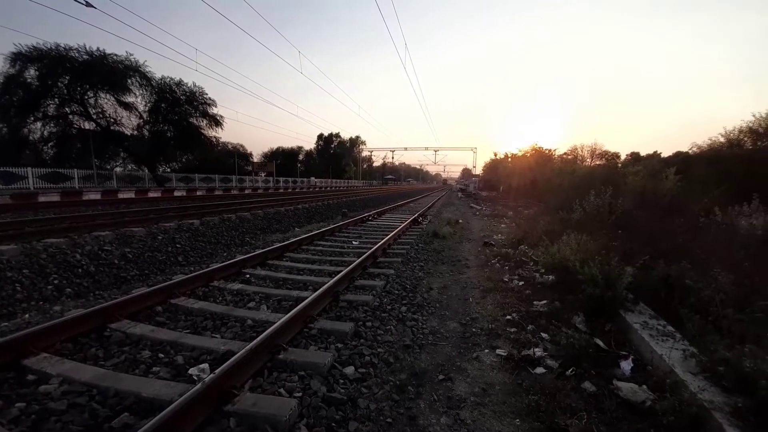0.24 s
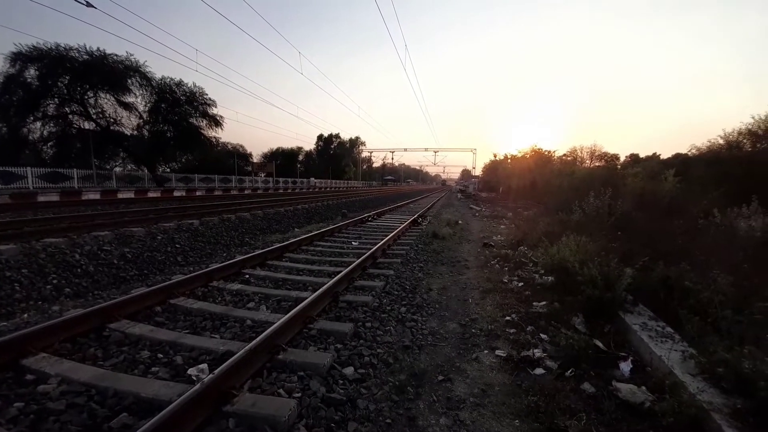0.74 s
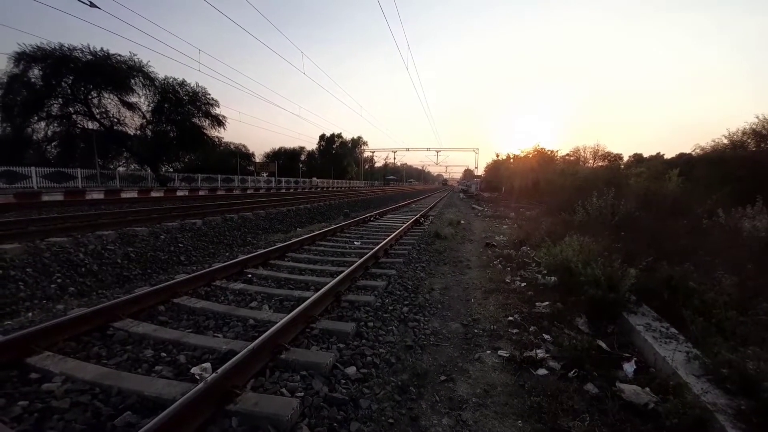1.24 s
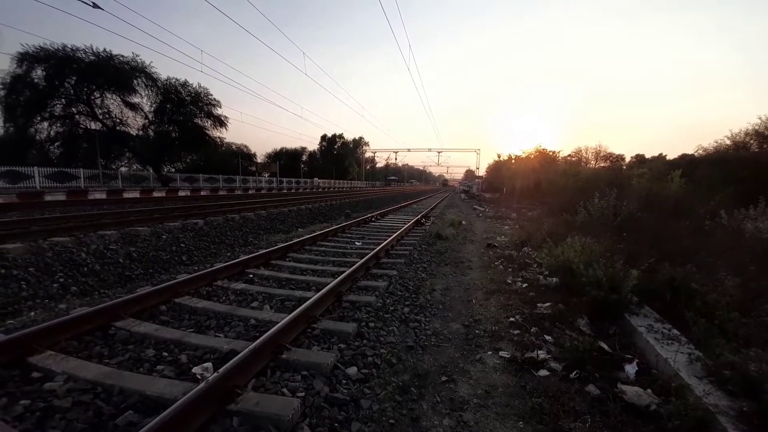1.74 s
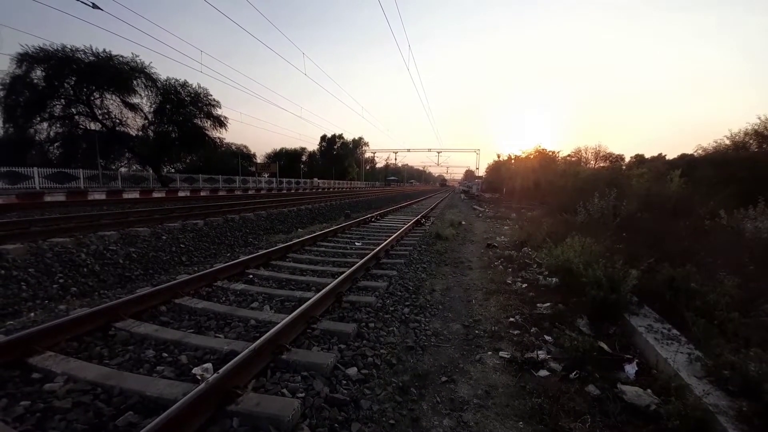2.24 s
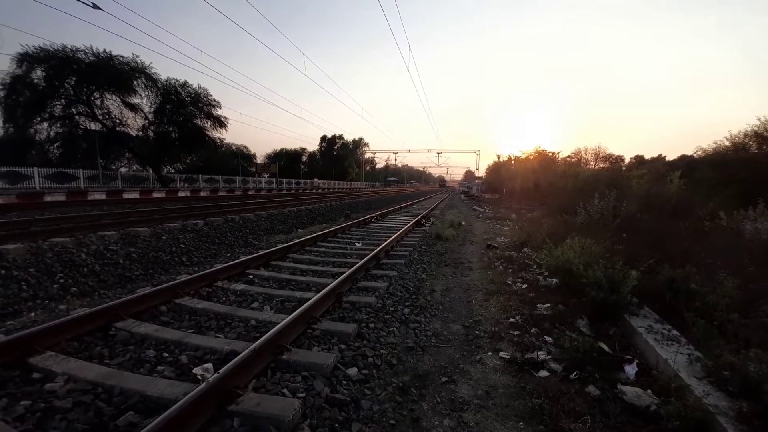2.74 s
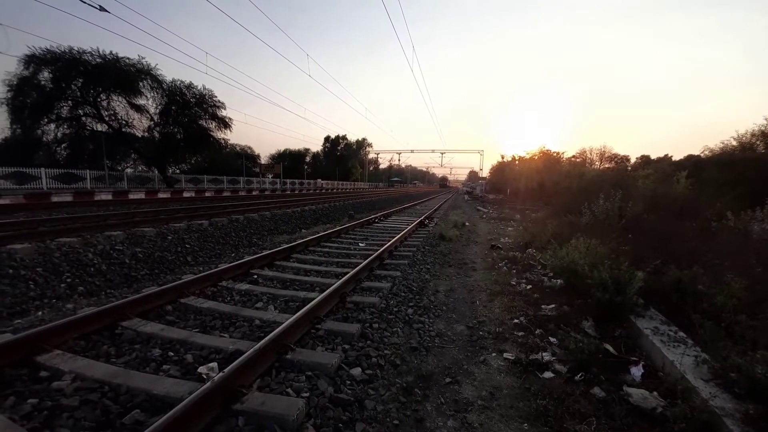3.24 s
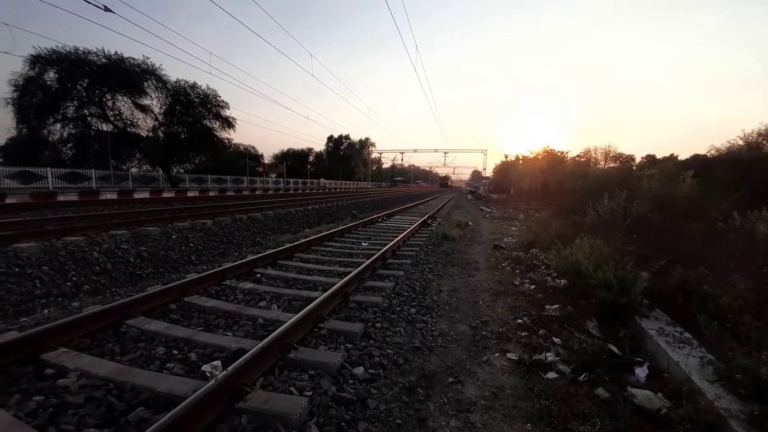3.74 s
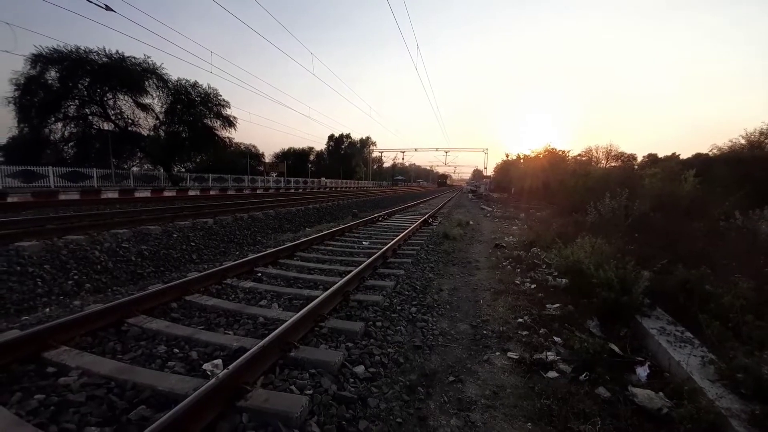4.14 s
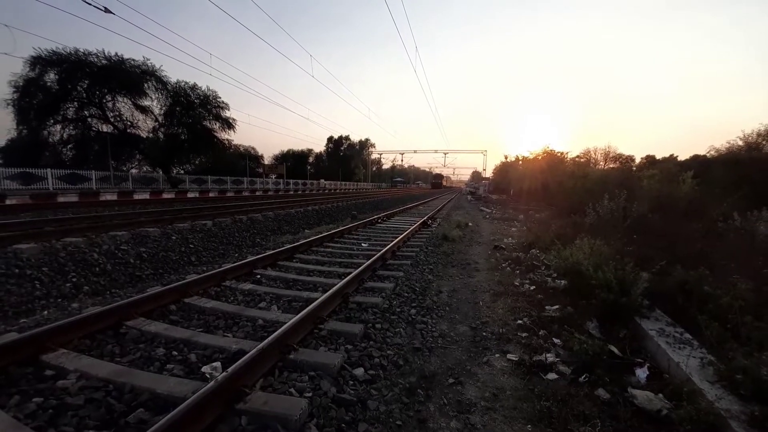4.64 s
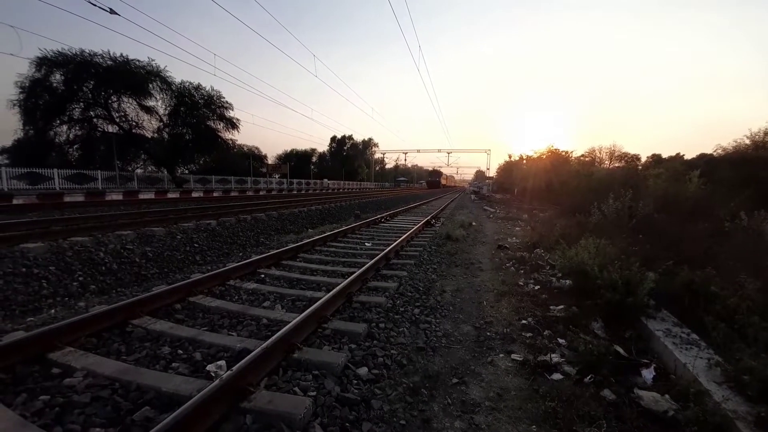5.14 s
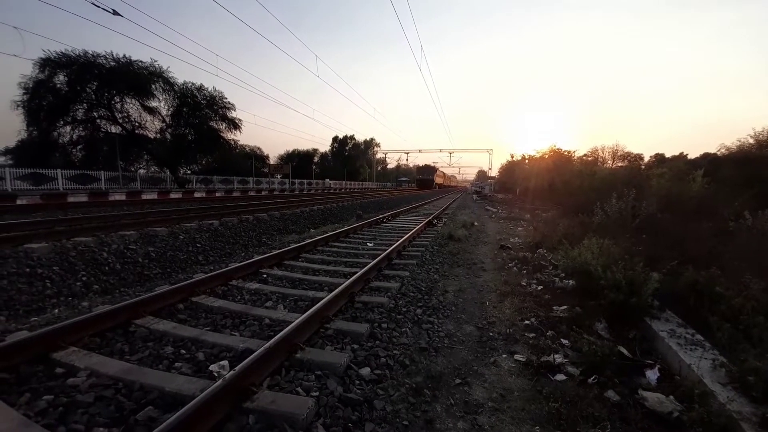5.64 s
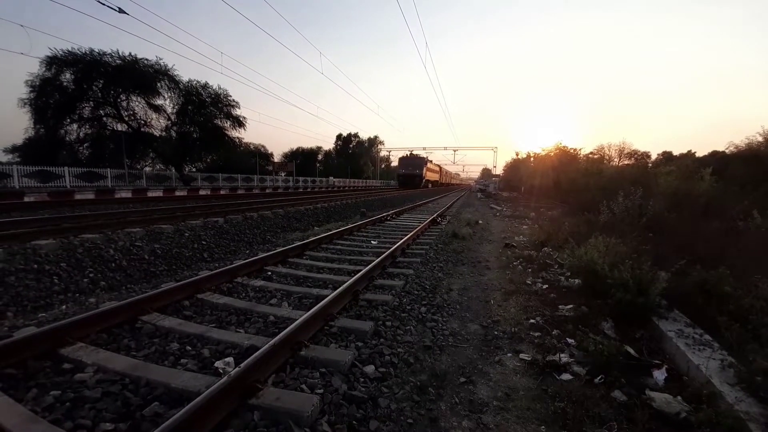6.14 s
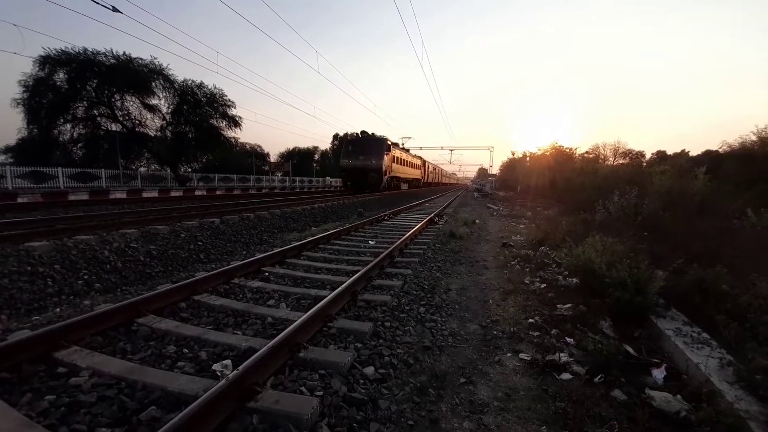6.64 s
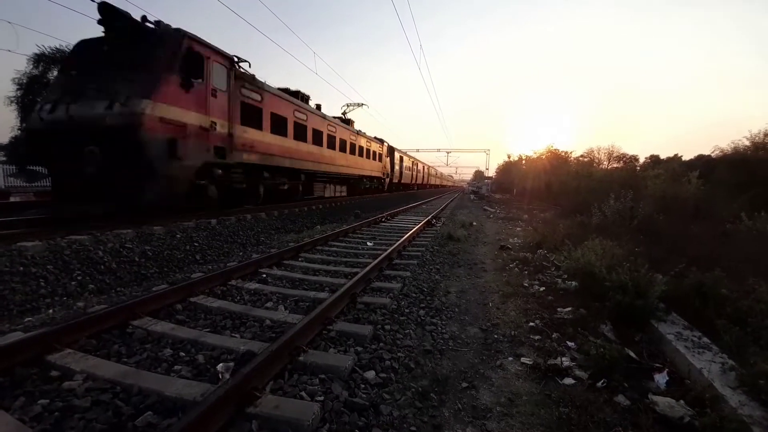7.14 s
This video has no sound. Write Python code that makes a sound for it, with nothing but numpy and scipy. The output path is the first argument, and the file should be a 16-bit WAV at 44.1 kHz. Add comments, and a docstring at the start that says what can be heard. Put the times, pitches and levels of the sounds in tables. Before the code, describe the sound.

A sustained mid-pitched train horn approaches, growing louder, its brassy edge fading and returning as air pressure sags. Small birds whistle and an insect rasps faintly beneath. After the blast dies with a short echo, metallic wheel tones emerge from blurred rolling noise. One brief gentle toot rings out, then heavy rumble, steel roar and hiss swell abruptly to the end. Open air, fixed stereo microphone close to the track.

```python
"""An electric express nears on open track, one long horn blast already sounding: beating, Doppler-lowered partials.
Trees and masts return late echoes at lower pitch; birds (arcs of pitch) and an insect (noise rasps) call early on.
As the blast stops, wobbling wheel tones rise out of a blur of noise, and a short, soft toot follows.
Rumble, rolling noise and rail hiss, all shaped noise, swell until the engine draws level near the end."""
import sys
import numpy as np
from scipy import signal
from scipy.fft import rfft, irfft, next_fast_len
from scipy.io import wavfile
from scipy.ndimage import uniform_filter1d

SR = 44100
rng = np.random.default_rng(int(sys.argv[2]) if len(sys.argv) > 2 else 0)


def log_audio(samples):
    """Write samples as a 16-bit WAV file to the path given in sys.argv[1]."""
    # one column per channel
    frames = np.atleast_2d(samples).T
    # limit to full scale, then quantise
    limited = np.clip(frames, -1, 1)
    pcm = np.round(limited * 32767).astype(np.int16)
    wavfile.write(sys.argv[1], SR, pcm)


N = 325017
TIME = np.arange(N) / SR
FREQS = np.maximum(np.fft.rfftfreq(N, 1 / SR), 1)

# the engine runs straight at the listener and draws level at PASS_S
SPEED_M_PER_S, PASS_S = 31.1, 7.33
# the horn's levels hold at HORN_DISTANCE_M; the valve is shut at BLAST_END_S, the blare dies sooner
HORN_DISTANCE_M, BLAST_END_S, BLARE_END_S = 80.6, 5.16, 5.06
# horn pitch with the valve wide open, and its rise when the air sags
OPEN_HZ, SAG_RANGE_HZ = 377, 9
# pitch of the long blast, lowest with the valve wide open, rising as the air sags: [t/s, f/Hz]
HORN_PITCH = [(0.0, 377.2), (0.6, 377.2), (0.93, 379.7), (1.08, 379.2), (1.33, 385.5), (1.6, 386.6),
              (1.73, 386.1), (1.86, 381.7), (2.22, 379.6), (2.48, 382.0), (2.88, 382.4), (3.03, 380.3),
              (3.3, 378.8), (3.55, 380.5), (3.82, 381.5), (4.07, 377.1), (4.9, 377.1), (5.12, 386.4)]
# width of the sound field: [f/Hz, side-to-mid level/dB]
FIELD_WIDTH = [(60, -12), (150, -19.5), (330, -9), (650, -6), (950, 0.5), (1150, 7), (1500, -2.5),
               (2500, -2), (15000, 0)]


def from_db(db):
    """Decibels to gain."""
    return 10 ** (np.asarray(db) / 20)


def rms_one(x):
    """Scale to unit rms."""
    return x / np.sqrt(np.mean(x ** 2) + 1e-20)


def in_time(rows):
    """Each column of a curve table at every sample."""
    s, *columns = np.transpose(rows)
    return [np.interp(TIME, s, column) for column in columns]


def at_hz(points, hz):
    """Read a table on a log-frequency axis."""
    table_hz, values = np.array(points)[:, 0], np.array(points)[:, 1]
    return np.interp(np.log(hz), np.log(table_hz), values)


def bumps_db(rows):
    """Smooth rises and dips in level from rows of (s, half length s, dB)."""
    return sum(db * np.exp(-((TIME - s) / half_s) ** 2) for s, half_s, db in rows)


def drift(rate_hz):
    """Slow random wander of spread 1: noise through a two-pole lowpass, one value per 100 samples."""
    r = np.exp(-200 * np.pi * rate_hz / SR)
    steps = rng.standard_normal(N // 100 + 1002)
    slow = signal.lfilter([1], [1, -2 * r, r * r], steps)[1000:]   # the filter has settled
    return np.interp(np.arange(N) / 100, np.arange(len(slow)), rms_one(slow))


def pan(db):
    """Left and right gains for a level difference."""
    return from_db(np.array([[db], [-db]]) / 2)


def late(x, delay_s):
    """Delay a sound that was already going on."""
    return np.interp(TIME - delay_s, TIME, x)


def gate(start_s, end_s, rise_s, fall_s):
    """Opens at the start, is shut by the end."""
    return np.clip((TIME - start_s) / rise_s, 0, 1) * np.clip((end_s - TIME) / fall_s, 0, 1)


def note(start_s, attack_s, hold_s, t60_s):
    """Attack, hold and a ringing release."""
    age = np.maximum(TIME - start_s, 0)
    return (1 - np.exp(-age / attack_s)) * from_db(-60 * np.maximum(age - hold_s, 0) / t60_s)


def field(gain):
    """Stereo noise with a gain per frequency and a width per frequency; the mid has rms 1."""
    size = next_fast_len(N)
    hz = np.maximum(np.fft.rfftfreq(size, 1 / SR), 1)
    mid, side = rfft(rng.standard_normal((2, size))) * np.interp(hz, FREQS, gain)
    mid = irfft(mid, size)[:N]
    side = irfft(side * from_db(at_hz(FIELD_WIDTH, hz)), size)[:N]
    return np.array([mid + side, mid - side]) / np.std(mid)


def noise(spectrum):
    """Stereo noise that falls away by a further 12 dB per octave beyond the ends of its spectrum."""
    ends = np.minimum(FREQS / spectrum[0][0], 1) * np.minimum(spectrum[-1][0] / FREQS, 1)
    return field(from_db(at_hz(spectrum, FREQS)) * ends * ends)


def ahead_m():
    """Track that the engine has still to cover."""
    return SPEED_M_PER_S * np.maximum(PASS_S - TIME, 0)


def nearing(level_db, reach_m, falloff, loss_db_per_m=0):
    """Gain of a source on the train: level_db when alongside, less by spreading and loss farther off."""
    spreading = np.hypot(1, ahead_m() / reach_m) ** -falloff
    return from_db(level_db - loss_db_per_m * ahead_m()) * spreading


def horn_distance():
    """Distance of the horn as a multiple of HORN_DISTANCE_M."""
    return np.maximum(ahead_m(), 1) / HORN_DISTANCE_M


def sag():
    """Loss of air pressure in the horn: 0 wide open, about 1 at its weakest."""
    return np.maximum(in_time(HORN_PITCH)[0] - OPEN_HZ, 0) / SAG_RANGE_HZ


def partial(phase, order, lead=0.33):
    """One horn partial of rms 1, its phase ahead in the left channel (lead in radians)."""
    angle = ((order * phase + rng.uniform(0, 2 * np.pi)) % (2 * np.pi)).astype(np.float32)
    return np.sqrt(2) * np.cos(angle + np.float32([[lead], [-lead]]) / 2)


def blare_partials():
    """The horn's upper partials as (multiple, dB)."""
    # partials 4 to 15, relative to each other: [level/dB]
    upper_levels = [-5.5, 0, -0.5, -4.5, -7, -14, -21, -20.5, -23.5, -27.5, -24.5, -30.5]
    return list(enumerate(upper_levels, 4))


def horn(jitter=0.00038):
    """The diaphragm buzzes in a flared bell; as the air pressure sags it goes sharp and dull."""
    pitch, = in_time(HORN_PITCH)
    phase = 2 * np.pi * np.cumsum(pitch * (1 + jitter * drift(38))) / SR
    return horn_fundamental(phase) + horn_core(phase) + horn_brass(phase)


def horn_fundamental(phase, level_db=-17.5, sag_loss_db=4.0, falloff=0.88, echo_db=-12.0,
                     linger_s=0.11, release_s=.13):
    """The lowest partial beats against a trackside echo, faster as the engine nears, and outlasts the blare."""
    beat_per_s, beat_rise_per_s2, first_beat_s = 2.98, .74, .073   # beat rate at 0 s, its rise, first minimum
    # brief dips and swells of the fundamental: [t/s, half length/s, level/dB]
    fades = [(0.058, 0.028, -13), (0.425, .03, -13), (0.921, .03, -9), (1.054, 0.045, 5), (1.72, 0.072, -5),
             (2.08, .05, 3), (2.18, 0.029, -18), (3.294, 0.035, 3)]
    beats = beat_per_s * (TIME - first_beat_s) + beat_rise_per_s2 * (TIME ** 2 - first_beat_s ** 2) / 2
    with_echo = 1 - from_db(echo_db) * np.exp(-2j * np.pi * beats)
    gain = from_db(level_db - sag_loss_db * sag() ** 2 + bumps_db(fades)) * horn_distance() ** -falloff
    blowing = gate(-1, BLAST_END_S + linger_s, .1, release_s)
    return gain * np.abs(with_echo) * blowing * partial(phase + np.angle(with_echo), order=1)


def horn_core(phase, second_db=-20.5, third_db=-24.0, sag_loss_db=11.5, sag_power=2.12, falloff=0.61,
              flutter_db=0.64, waver_db=0.82, release_s=0.3):
    """The second and third partials hold up until the air gets really weak."""
    gain = from_db(-sag_loss_db * sag() ** sag_power) * horn_distance() ** -falloff
    gain = gain * gate(-1, BLAST_END_S + 0.11, .1, release_s)
    second = from_db(second_db + waver_db * drift(9.8)) * partial(phase, order=2)
    third = from_db(third_db + flutter_db * drift(37)) * partial(phase, order=3)
    return gain * (second + third)


def horn_brass(phase, level_db=-36.5, sag_loss_db=20.0, sag_power=0.78, falloff=.5, twinkle_db=2.86,
               dip_hz=2820, dip_width_hz=400, release_s=0.094):
    """The blare needs full pressure. The ground cancels a band of it; turbulent air makes it twinkle."""
    # depth of the dip the ground cuts, negative where it lifts the band: [t/s, depth/dB]
    ground_dip = [(0, 12.5), (1.1, 8.5), (2.1, 6.5), (3.3, 4.5), (4.05, -5.5), (4.4, -2), (4.9, 6.5)]
    # moments when the blare swells or fades: [t/s, half length/s, level/dB]
    blare_swells = [(.25, .2, 1), (1.0, 0.21, -2.5), (2.02, .19, 5.5), (3.35, .28, -3.5), (4.15, .15, 1.5)]
    gain = from_db(level_db - sag_loss_db * sag() ** sag_power) * horn_distance() ** -falloff
    gain = gain * gate(-1, BLARE_END_S, .1, release_s)
    dip_db, = in_time(ground_dip)
    out = 0
    for multiple, db in blare_partials():
        cancelled_db = dip_db * np.exp(-((multiple * OPEN_HZ - dip_hz) / dip_width_hz) ** 2)
        twinkle = twinkle_db * drift(2.5)
        out = out + from_db(db - cancelled_db + twinkle) * partial(phase, order=multiple)
    return gain * from_db(bumps_db(blare_swells)) * out


def horn_echoes(first_db=-19.0, second_db=-12.0, third_db=-4.0, brass_db=-31.5, scatter_db=-29.5,
                core_sag_db=4.0, brass_sag_db=9.0, falloff=0.52, brass_falloff=0.58, linger_s=0.22,
                fade_db=3.5, wander=0.003, count=12):
    """Objects beside and behind the train hear a lower pitch and send it back late."""
    # strong echoes: [Doppler ratio, delay/s, level/dB, left-right difference/dB, overtone level/dB]
    strong = [(.843, .22, -18.5, -1, 2), (.981, 0.046, -19, -11, -4.5), (.99, 0.137, -19, 2.5, -4)]
    # weak echoes at random delays and sides, same columns
    weak = np.column_stack([np.linspace(.85, .975, count), rng.uniform(.05, .35, count),
                            np.full(count, scatter_db), rng.normal(0, 2.8, count), np.zeros(count)])
    pitch, = in_time(HORN_PITCH)
    carried = from_db(first_db) * horn_distance() ** -falloff
    blowing = gate(-1, BLAST_END_S, .1, 0.13)
    first_strength = carried * gate(-1, BLAST_END_S + linger_s, .1, 0.39)
    core_strength = carried * from_db(-core_sag_db * sag()) * blowing
    brass_strength = from_db(brass_db - brass_sag_db * sag()) * horn_distance() ** -brass_falloff * blowing
    # partials as (multiple, dB) with their strength in time; 0.98 sounds as 1, it only sets the width
    groups = [([(0.98, 0)], first_strength),
              ([(2, second_db), (3, third_db)], core_strength),
              (blare_partials(), brass_strength)]
    turn = np.linspace(0, 2 * np.pi, 4096, endpoint=False)   # one cycle, read as a wavetable
    out = np.zeros((2, N))
    for ratio, delay_s, db, side_db, overtones_db in np.vstack([strong, weak]):
        cycles = np.cumsum(ratio * late(pitch, delay_s) * (1 + wander * drift(9.63))) / SR
        place = (cycles * len(turn)).astype(int) % len(turn)
        level = from_db(db + fade_db * drift(4.0))
        for partials, strength in groups:
            multiples, partial_db = np.transpose(partials)[:, :, None]
            # random phases, which differ more between left and right where the field is wide
            spread = np.minimum(from_db(at_hz(FIELD_WIDTH, multiples * OPEN_HZ)), 1)
            offsets = rng.uniform(0, 2 * np.pi, multiples.shape)
            offsets = offsets + spread * rng.standard_normal((2,) + multiples.shape)
            gains = from_db(partial_db + overtones_db * (multiples > 1))
            wave = np.sqrt(2) * np.sum(gains * np.cos(np.round(multiples) * turn + offsets), axis=1)
            out += np.take(wave * pan(side_db), place, axis=1) * (late(strength, delay_s) * level)
    return out


def scattered_blare(level_db=-42.0, sag_loss_db=19.0, falloff=1.13, delay_s=.05, release_s=0.61):
    """Leaves and ballast smear the top of the horn into a bright haze of noise."""
    # colour of the haze: [f/Hz, relative level/dB per Hz]
    haze = [(1700, -14), (2200, -4), (2550, -7.5), (2950, 1), (3400, -3), (4200, -14), (5500, -25)]
    gain = from_db(level_db - sag_loss_db * sag()) * horn_distance() ** -falloff
    gain = gain * gate(-1, BLARE_END_S, .1, release_s)
    return late(gain, delay_s) * noise(haze)


def toot(first_db=-7.5, second_db=-18.0, attack_s=0.0089, hold_s=0.1, t60_s=0.34, second_hold_s=0.035,
         second_t60_s=0.31, scoop_hz=22, settle_s=0.0084):
    """A brief, soft touch of the valve: the pitch drops into place and the bell rings out."""
    settled_hz, start_s = 385, 6.703
    pitch = settled_hz + scoop_hz * np.exp(-np.maximum(TIME - start_s, 0) / settle_s)
    phase = 2 * np.pi * np.cumsum(pitch) / SR
    first = from_db(first_db) * note(start_s, attack_s, hold_s, t60_s) * partial(phase, order=1)
    second_gain = from_db(second_db) * note(start_s, attack_s, second_hold_s, second_t60_s)
    return first + second_gain * partial(phase, order=2)


def wheels(tone_db=6.0, blur_db=-3.0, tone_rise_db_per_s=9.5, blur_rise_db_per_s=0.23, flutter_db=2.0,
           left_lead=2.08):
    """Rail roughness rings the wheel discs: a far blur, out of which the nearest wheels' modes rise."""
    # shared level curve of tones and blur, before their own trims: [t/s, level/dB]
    ringing = [(5.3, -33), (5.75, -35.5), (6.35, -30.5), (6.55, -27.5), (6.95, -23.5), (7.12, -22.5),
               (7.21, -18), (7.29, -20), (7.35, -15.5)]
    # modes of the nearest wheels: [f/Hz, pitch wander/Hz, relative level/dB]
    modes = [(1030, 1.8, -15.5), (1091, 1.5, -10.5), (1134, 5, 1), (1186, 3.77, -3.5)]
    # crowd of farther wheels: [f/Hz, relative level/dB per Hz]
    far_wheels = [(700, -27), (820, -13), (930, -10.5), (1050, -4), (1150, -0.5), (1260, -8), (1400, -22)]
    ring_db, = in_time(ringing)
    early_s = np.maximum(ringing[0][0] - TIME, 0)   # time left before the level curve starts
    tones = np.zeros((2, N))
    for hz, wander_hz, db in modes:
        phase = 2 * np.pi * np.cumsum(hz + wander_hz * drift(25.9)) / SR
        half_lead = (left_lead + .5 * drift(6)) / 2   # radians
        tones += from_db(db + flutter_db * drift(13)) * np.cos([phase + half_lead, phase - half_lead])
    blur = from_db(ring_db + blur_db - blur_rise_db_per_s * early_s) * noise(far_wheels)
    return blur + from_db(ring_db + tone_db - tone_rise_db_per_s * early_s) * tones


def train(surge_db=0.4, rattle_db=1.5, hiss_db=-62):
    """Ground rumble, drumming bogies, roaring bodies, steel rolling on steel and hiss ahead in the rails."""
    # colours of the layers, from ground rumble to rail hiss, and of a faint steady treble hiss that does not
    # come from the train: [f/Hz, relative level/dB per Hz]
    ground, drumming, roar = [(20, -23), (40, -17), (53, 1.5), (66, -2.5), (86, 4), (115, -8), (150, -21),
                              (220, -36.5), (400, -61)], [(90, -3), (125, 2.5), (165, -5.5), (200, -9), (255, -2.5),
                                              (320, -10.5)], [(90, -24), (150, -13.5), (200, -11.5),
                                                              (270, -1.5), (330, 7), (450, 0.5), (600, -7),
                                                              (900, -9.5), (1500, -34)]
    steel, wheel_rush = [(90, -3), (140, 1), (200, -5.5), (300, 2.5), (620, -2.5), (780, 9), (1000, 6),
                         (1280, 9), (1420, 0.5), (2250, -1.5), (2600, -10), (3000, -4.5), (4000, -10.5),
                         (7000, -25.5)], [(70, -9), (140, 5), (200, 6.5), (270, 10), (450, -9),
                                          (1200, -13.5), (2000, -2.5), (2900, 0), (3900, -3.5), (5500, -11),
                                          (8000, -19.5), (12000, -24.5), (15500, -36.5)]
    rail_hiss, treble_hiss = [(2500, -16.5), (4500, 3), (6100, 0), (6800, 8), (7800, -9), (9000, -2.5),
                              (9600, 1.5), (10500, -2), (13000, -1.5), (14600, -4.5), (15700, -15.5)], [(8500, -24.5), (11000, -7), (12700, 1.5), (14500, -1),
                                            (15700, -12.5)]
    # swells of the rumble: [t/s, half length/s, level/dB]
    rumble_swells = [(1.6, .06, 4), (4.0, .28, 3)]
    surge = from_db(bumps_db(rumble_swells) + surge_db * drift(2.6))
    out = nearing(-23.5, reach_m=15.3, falloff=1.05) * surge * noise(ground)
    out += nearing(-21.5, reach_m=13.2, falloff=1.0, loss_db_per_m=0.28) * noise(drumming)
    out += nearing(-22.0, reach_m=6.24, falloff=0.87) * noise(roar)
    out += nearing(-22.5, reach_m=14.1, falloff=1.026) * from_db(rattle_db * drift(25)) * noise(steel)
    # the rush of the wheels is only heard from close by
    rush_gain = nearing(-19.0, reach_m=5, falloff=.55, loss_db_per_m=1.0)
    out += rush_gain * from_db(rattle_db * drift(30)) * noise(wheel_rush)
    # the rails guide their hiss, so it hardly spreads and fades by the metre
    hiss_gain = nearing(-40.5, reach_m=25, falloff=0.38, loss_db_per_m=0.08)
    out += hiss_gain * from_db(.5 * drift(20)) * noise(rail_hiss)
    return out + from_db(hiss_db) * noise(treble_hiss)


def birds(level_db=0., waver=0.009, echo_db=-17.5, count=5):
    """Thin whistles, each one arc of pitch, smeared a little by the trees."""
    # notes: [t/s, length/s, start f/Hz, middle f/Hz, end f/Hz, level/dB]
    whistles = [(0.125, 0.06, 4500, 4680, 5050, -47), (.62, 0.095, 4400, 4540, 4770, -55),
                (0.875, 0.085, 4150, 4450, 4930, -44), (0.926, 0.21, 4850, 5130, 5300, -55),
                (1.122, 0.068, 5300, 5520, 5860, -53), (1.26, .06, 4170, 4300, 4100, -55),
                (1.375, 0.14, 3680, 4100, 3760, -46), (1.53, 0.058, 4400, 4420, 4370, -57),
                (1.725, 0.105, 4850, 4600, 3730, -48), (1.85, 0.068, 3520, 3350, 3300, -47),
                (1.968, .05, 4270, 4400, 4650, -55), (2.42, 0.031, 3860, 4100, 4200, -48),
                (2.605, 0.026, 3860, 4070, 4330, -51.5), (3.145, 0.059, 4300, 4530, 5000, -50),
                (3.609, 0.11, 3860, 4140, 3850, -45.5)]
    out = np.zeros(N)
    wobble = 1 + waver * drift(150)
    for s, length_s, start_hz, middle_hz, end_hz, db in whistles:
        u = np.linspace(0, 1, int(length_s * SR))
        span = slice(int(s * SR), int(s * SR) + len(u))
        arc = np.polyfit([0, .5, 1], [start_hz, middle_hz, end_hz], 2)
        pitch = np.polyval(arc, u) * wobble[span]
        whistle = np.sin(np.pi * u) * np.sin(2 * np.pi * np.cumsum(pitch) / SR)
        out[span] += from_db(db + level_db) * whistle
    echoes = sum(late(out, delay_s) for delay_s in rng.uniform(0.0064, 0.19, count))
    return (out + from_db(echo_db) * echoes) * pan(2.5)


def insect(level_db=-6.5, rise_s=0.0043, grain_db=3.0):
    """Very high, short rasps: grainy noise with a quick rise and a longer tail."""
    # rasps, before the trim level_db: [t/s, peak level/dB]
    strokes = [(.212, -46), (.31, -46.5), (.45, -48.5), (.468, -49), (0.552, -50), (.94, -50),
               (1.05, -50.5), (1.205, -50.5), (1.30, -55), (1.68, -47.5), (2.44, -55), (2.68, -49.5),
               (2.775, -51.5)]
    # colour of a rasp: [f/Hz, relative level/dB per Hz]
    rasp_colour = [(6500, -20.5), (9000, -17), (11000, -6), (12200, -0.5), (13800, 11.5), (15500, -13.5)]
    envelope = np.zeros(N)
    for s, db in strokes:
        age = np.maximum(TIME - s, 0) / rise_s
        envelope += from_db(db + level_db) * 2 * age / (1 + age * age)   # peaks at rise_s
    return envelope * from_db(grain_db * drift(200)) * noise(rasp_colour)


def scene():
    """Everything heard from the side of the track."""
    return horn() + horn_echoes() + scattered_blare() + toot() + wheels() + train() + birds() + insect()


def gain_control(x, threshold_db=-14.5, slope=0.52, attack_s=0.035, release_db_per_s=8.5):
    """Turns the level down above a threshold and recovers slowly."""
    power = np.abs(uniform_filter1d(np.mean(x * x, axis=0), size=SR // 100))   # over 10 ms
    level_db = 10 * np.log10(power + 1e-12)
    recovery = release_db_per_s * TIME
    wanted_db = slope * np.maximum(level_db - threshold_db, 0)
    cut_db = np.maximum.accumulate(wanted_db + recovery) - recovery   # falls no faster than the release
    r = np.exp(-1 / (attack_s * SR))
    return x * from_db(-signal.lfilter([1 - r], [1, -r], cut_db))


def record(dry):
    """The right microphone is muffled in the treble; loud sounds are turned down, peaks rounded, the top cut."""
    # colour of the right microphone: [f/Hz, level/dB]
    right_colour = [(60, 1.8), (400, 0.65), (1100, -1.5), (3800, -2), (5000, -17.5), (6200, -20),
                    (7600, -38), (9200, -35), (11000, -11), (12800, -2), (15000, -9.5)]
    size = next_fast_len(N + SR // 10)
    hz = np.maximum(np.fft.rfftfreq(size, 1 / SR), 1)
    right = irfft(rfft(dry[1], size) * from_db(at_hz(right_colour, hz)), size)[:N]
    both = gain_control(np.array([dry[0], right]))
    rounded = both / (1 + (both * both / .85) ** 4) ** (1 / 8)
    top_cut = signal.ellip(12, .1, 80, 15750, fs=SR, output="sos")   # lowpass at 15750 Hz
    return signal.sosfilt(top_cut, rounded)


dry = scene()
out = record(dry)
log_audio(out)
```